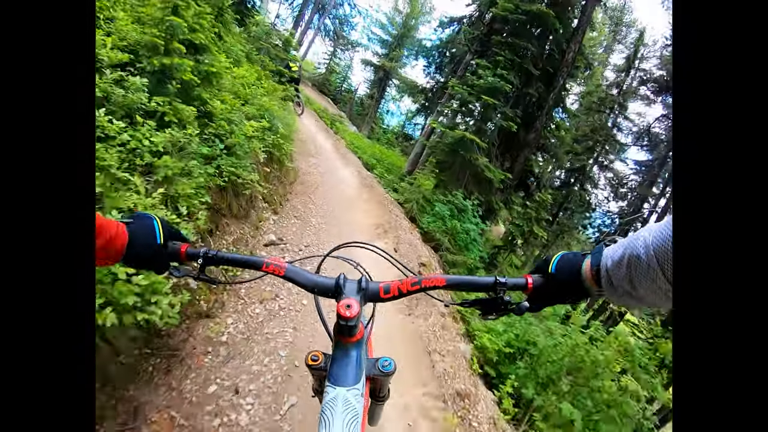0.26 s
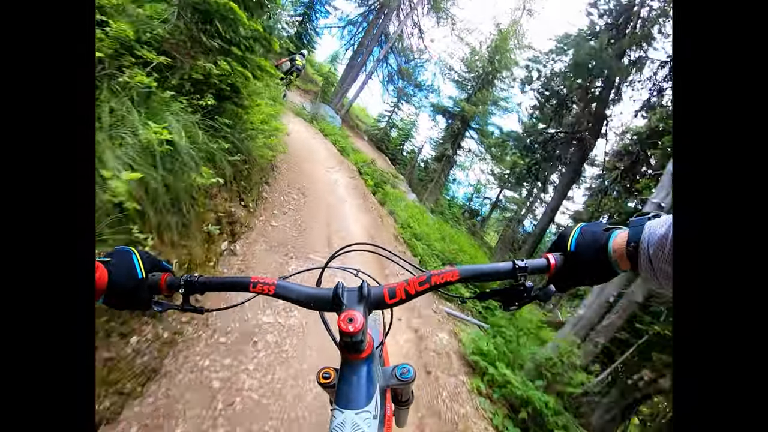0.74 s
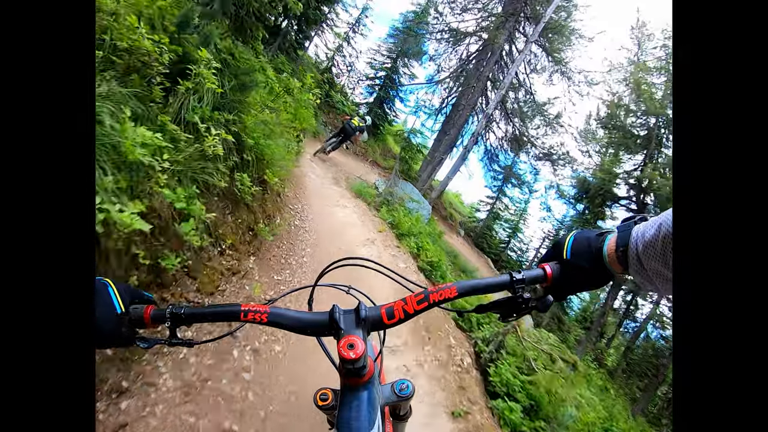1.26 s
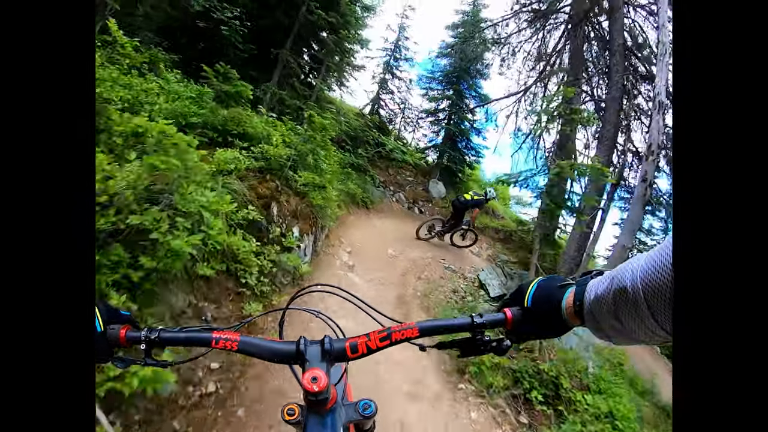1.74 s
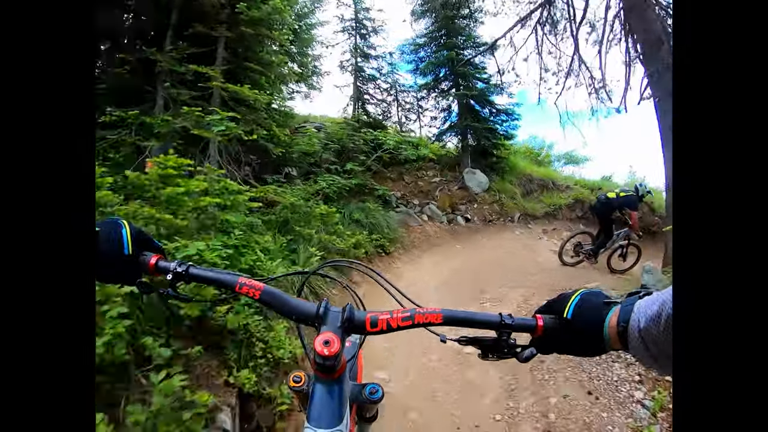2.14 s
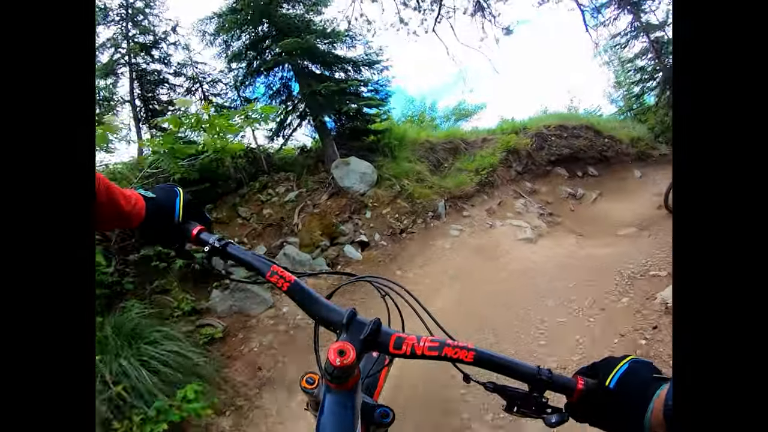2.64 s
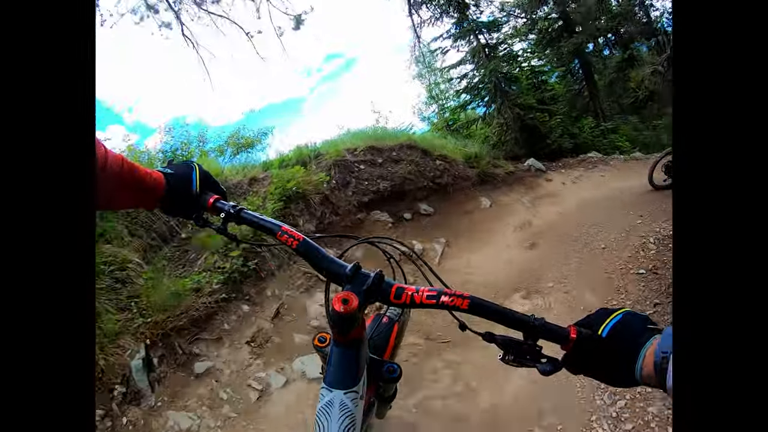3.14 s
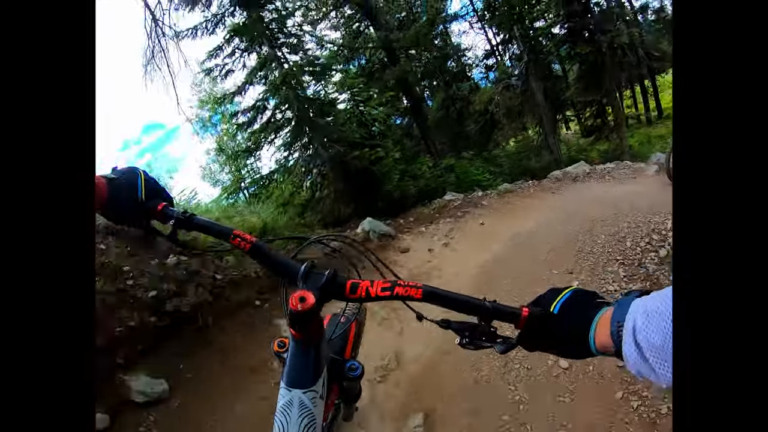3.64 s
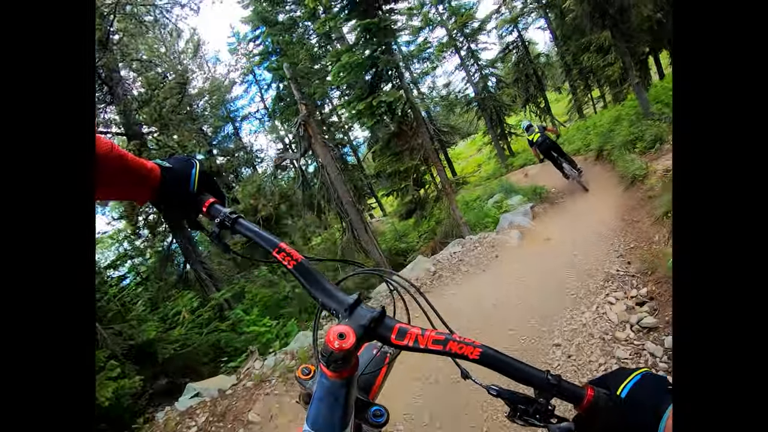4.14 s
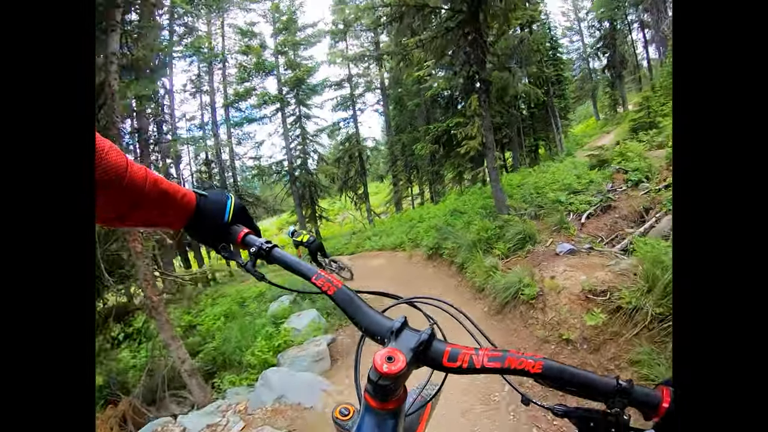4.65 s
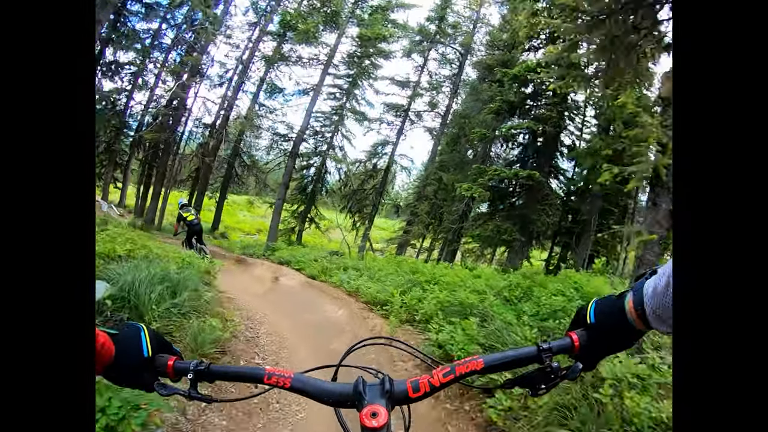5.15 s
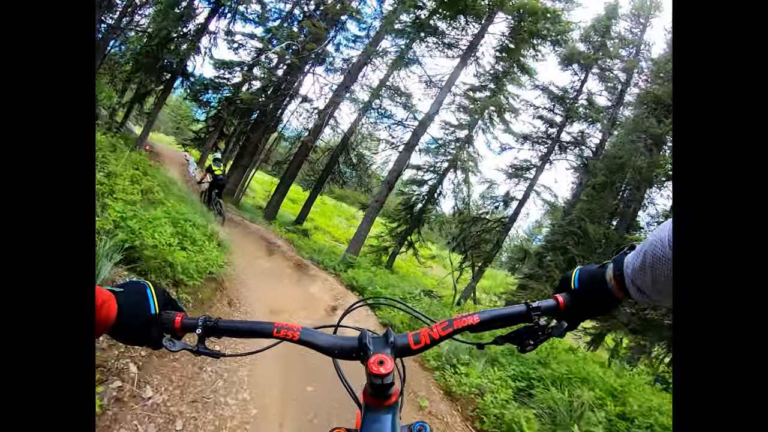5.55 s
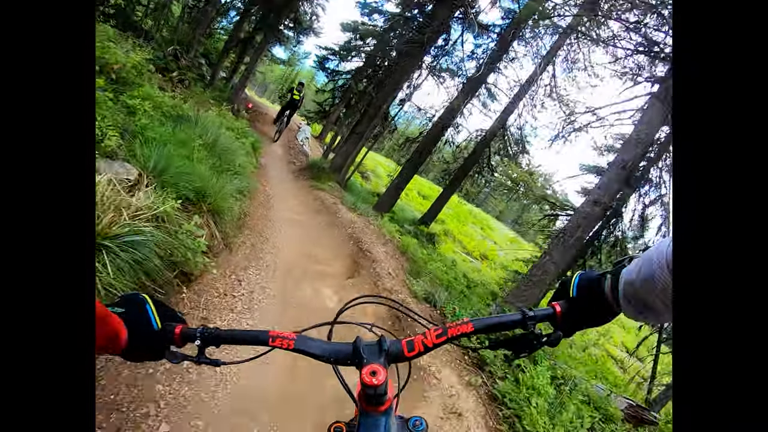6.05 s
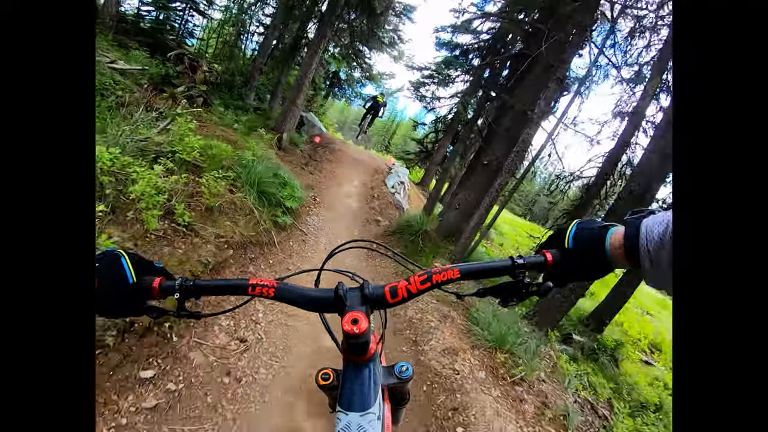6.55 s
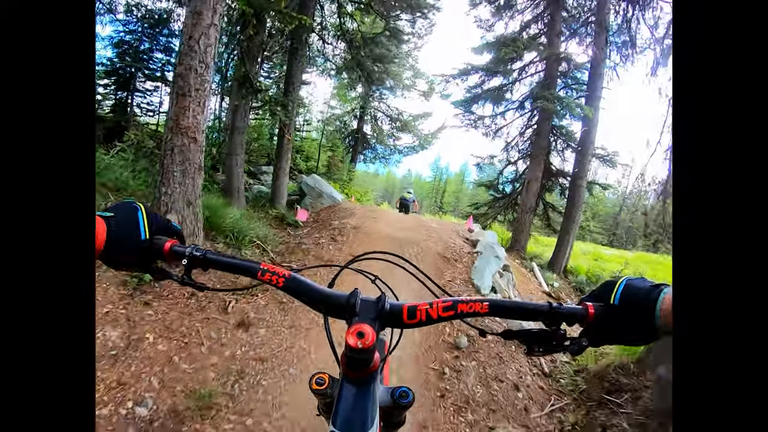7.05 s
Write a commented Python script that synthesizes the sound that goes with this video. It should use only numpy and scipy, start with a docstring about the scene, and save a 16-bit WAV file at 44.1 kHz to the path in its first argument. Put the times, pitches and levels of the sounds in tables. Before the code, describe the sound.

A mountain bike coasts down a dirt trail, heard close from the rider's chest. Throughout, low wind buffets the microphone over crunching, softly humming tyres and the rapid ticking of the freewheel. Chain and cables clatter against the frame in the first 0.6 seconds, with a couple of sharp snaps of grit. The wind gusts strongly, with its hardest thump at about 1.2 seconds. From around 2 seconds the ticking slows and the wind eases unevenly, while scattered knocks and grit continue. Between 3 and 4 seconds the ticking is slowest and brightest, under a run of duller knocks, and the tyre hum swells near 4 seconds. A sharp clack lands at 5 seconds, then the ticking speeds up. From 6 seconds come stronger gusts, flicks of grit and a burst of hard chain clatter, with the bike still rolling at the end, around 7.3 seconds.

```python
"""A mountain bike coasts down a dirt trail, heard from a camera on the rider's chest.
Chain and cables knock on the ringing frame over bumps, and the freewheel pawls tick in the hub,
slowing into the bend and speeding up out of it. The tyres crunch over dirt, hum with the air
inside them and flick up grit. Under the bike, wind buffets and slaps the microphone port."""
import sys
import numpy as np
from scipy import signal
from scipy.io import wavfile
from scipy.ndimage import uniform_filter1d

SR = 44100
rng = np.random.default_rng(int(sys.argv[2]) if len(sys.argv) > 2 else 0)


def transcribe(signal):
    """Save signal, clipped to [-1, 1], as a 16-bit WAV file at the path in sys.argv[1]."""
    frames = np.atleast_2d(signal).T
    limited = np.clip(frames, -1, 1)
    pcm = np.round(limited * 32767).astype(np.int16)
    wavfile.write(sys.argv[1], SR, pcm)


N = 321930


def amp(db):
    return 10 ** (np.asarray(db) / 20)


def unit_rms(x):
    return x / np.sqrt(np.mean(x ** 2) + 1e-20)


def curve(rows, column=1):
    """Automation lane: one column of a timed table, sample by sample."""
    rows = np.array(rows)
    return np.interp(np.arange(N) / SR, rows[:, 0], rows[:, column])


def wobble(seconds, count=N):
    """Smooth random drift of rms 1."""
    size = max(int(seconds * SR), 2)
    return unit_rms(uniform_filter1d(uniform_filter1d(rng.standard_normal(count), size), size))


def noise_band(low_hz, high_hz):
    """Band-passed noise of rms 1."""
    bandpass = signal.butter(2, [low_hz, high_hz], "band", fs=SR, output="sos")
    return unit_rms(signal.sosfilt(bandpass, rng.standard_normal(N)))


def eq(x, points):
    """Minimum-phase EQ through (freq_hz, gain_db) points."""
    freq_hz, gain_db = np.transpose(points)
    bins_hz = abs(np.fft.fftfreq(8192, 1 / SR))
    log_gain = np.interp(np.log(bins_hz + 1), np.log(freq_hz + 1), gain_db) * np.log(10) / 20
    taps = np.fft.ifft(np.exp(np.conj(signal.hilbert(log_gain)))).real
    return signal.oaconvolve(x, taps[:len(taps) // 2])[:len(x)]


def resonate(x, modes, dry_db, drift_db=0, spot_db=0):
    """Steep resonators over the dry sound; their levels drift, or vary with the spot struck."""
    out = amp(dry_db) * x
    for k, (pitch_hz, width_hz, gain_db) in enumerate(modes):
        b, a = signal.iirpeak(pitch_hz, pitch_hz / width_hz, SR)
        if drift_db:
            gain_db += drift_db * np.tanh(wobble(0.092, len(x)))
        else:
            gain_db += spot_db * rng.standard_normal()
        out = out + (-1) ** k * amp(gain_db) * signal.lfilter(b, a, signal.lfilter(b, a, x))
    return out


# The ring of the frame: pitch_hz, width_hz, gain_db
FRAME_MODES = [(589, 140, -1), (897, 187, 8), (1072, 220, 1), (1687, 72, 3.5), (1960, 370, -3),
               (2514, 303, 8), (3040, 260, -6), (3905, 200, 1), (4500, 630, -6)]
# Chain and cable hits, with thud and rattle set against the clack:
# hit_s, level_db, t60_s, thud_db, rattle_db, pitch_hz, rise_ms
CHAIN_HITS = [(0.047, -13.5, 0.029, -18, -24, 1910, 1.1), (0.076, -10.5, 0.05, -32, -11, 950, 5.5),
              (0.123, -16.5, 0.13, -15, 0.5, 958, 5.6), (.168, -19, 0.035, -18, -3, 2600, 8.7),
              (.236, -15.5, 0.077, -0.5, -12, 1260, 2.3), (.264, -17, 0.038, -11, -24, 1100, 1),
              (.299, -14, 0.028, -12, -8, 2170, 3.1), (.347, -11.5, 0.051, -7, -7.5, 2000, 3.6),
              (.452, -17, 0.038, -10, -13, 2630, 4.4), (.485, -15, 0.047, -12, -16, 990, 2.2),
              (.506, -11, 0.053, -7, -10, 895, 7.9), (.579, -16.5, 0.029, -14, -20, 1090, 3.5),
              (.614, -19, 0.074, -21, -13, 1070, 6.4), (0.85, -11, 0.047, -20, -16, 1800, 5.1),
              (1.006, -17.5, 0.081, -11, -11, 1800, 6), (1.165, -18, 0.044, -28, -5, 2500, 8.7),
              (1.206, -18, 0.021, -12, -23, 1050, 3.5), (1.38, -19.5, 0.049, -5, -21, 2640, 5),
              (1.735, -13.5, 0.021, -12, -13, 2680, 2.2), (1.988, -15, 0.047, -11, -17, 2550, 4),
              (2.023, -20, 0.16, -17, 1, 2570, 8), (2.208, -15, 0.048, -22, -14, 2936, 3.2),
              (2.236, -21, 0.043, -24, 1.5, 1200, 2.4), (2.3179, -9.5, 0.0087, -15, -30, 1230, 1.7),
              (2.419, -13.5, .061, -10, -5, 1040, 5.2), (2.474, -23.5, 0.058, 11.5, -15, 1000, 6.8),
              (2.492, -24, 0.055, -1, 4, 1050, 7.6), (2.524, -12, 0.035, -28, -10, 1060, 9.8),
              (2.654, -13, 0.047, -5.5, -8, 2650, 2.8), (2.939, -12, 0.032, -11, -7.5, 2430, 2.16),
              (3.254, -19, 0.039, -10, -18, 1150, 1.2), (3.317, -15.5, 0.12, 1, -20, 1030, 2.2),
              (3.355, -21, 0.079, 4.5, -9, 1870, 4), (3.382, -15.5, 0.069, -9, -12, 1074, 2),
              (3.454, -18, 0.087, 3.5, -24, 2553, 2.3), (3.491, -20.5, 0.052, 2.5, -8, 1060, 3.5),
              (3.534, -16, 0.077, -9, -20, 1000, 1.8), (3.709, -17.5, 0.034, 5, -1.5, 915, 9.8),
              (3.73, -22, 0.076, 7.5, -12, 1810, 4.3), (3.751, -14, 0.11, 2, -18, 987, 8),
              (3.931, -15, 0.047, 7, -22, 937, 1.96), (3.939, -19.5, 0.053, 3.5, 1.5, 950, 3.2),
              (4.404, -16, 0.033, -14, -18, 1880, 10), (4.865, -23, 0.054, -11, 0, 2520, 4.4),
              (5.0022, -4, 0.015, -13, -37, 1707, 4.4), (5.16, -17.5, 0.06, 2, -23, 1025, 1.8),
              (5.217, -13, 0.039, -4, -13, 807, 11), (5.365, -17, 0.089, -12, -24, 2634, 8.4),
              (5.596, -18.5, 0.036, -25, -6, 1031, 4.4), (6.052, -19.5, 0.072, -15, -2, 2493, 5.5),
              (6.0743, -9, .03, -12, -12, 2073, 2.8), (6.094, -9.5, 0.043, -29, -21, 1020, 5.4),
              (6.139, -18, 0.048, 2, 2, 1976, 5.1), (6.261, -5, 0.044, -25, -19, 2000, 3.8),
              (6.419, -15.5, 0.037, -1, -5, 3037, 5), (6.459, -7.5, 0.1, -4.5, -20, 2520, 4.9),
              (6.605, -10, 0.069, -5, -7, 2000, 6.2), (6.652, -13.5, 0.11, -20, -4, 856, 7.8),
              (6.688, -15.5, 0.094, -8, -5, 2154, 8.3), (6.727, -20.5, 0.06, 3, 2, 985, 5.9),
              (6.855, -17, 0.041, -22, -5, 2635, 5), (6.896, -20.5, 0.026, -15, -6, 1008, 2.8),
              (6.918, -16, 0.034, -24, -18, 2640, 6.2), (7.02, -11, 0.039, -16, -32, 1050, 1.3),
              (7.07, -21, 0.026, -13, -20, 990, 2.7), (7.136, -16.5, .052, -22, -14, 1170, 6)]


def chain_knocks():
    """Each bump throws chain links against the frame: a clatter swells to one hard blow and dies."""
    out, lead = np.zeros(N + SR), SR // 40
    t = (np.arange(SR // 8) - lead) / SR
    for hit_s, level_db, t60_s, thud_db, rattle_db, pitch_hz, rise_ms in CHAIN_HITS:
        doubling_s = np.clip(rise_ms, 1, 10) / 1000
        envelope = amp(np.where(t < 0, 6 * t / doubling_s, -60 * t / t60_s))
        crackle = rng.standard_normal(len(t)) * amp(9.4 * rng.standard_normal(len(t)))
        clatter = envelope * unit_rms(crackle)
        thud = eq(clatter, [(150, -12), (380, -8), (650, -8.5), (1000, -35.5)])
        rattle = eq(clatter, [(2200, 1.5), (3500, 18), (5500, 14), (7000, 4.5), (14000, -61)])
        links = eq(clatter, [(250, -14), (600, -5), (pitch_hz, 0), (3400, -5), (5000, -24), (9000, -40)])
        links = resonate(links, FRAME_MODES, dry_db=1, spot_db=4.5)
        blow = -np.cos(2 * np.pi * pitch_hz * t) * np.exp(-(2 * pitch_hz * t) ** 2)
        blow_gain = 0.04 / t60_s  # the shorter the hit, the more it is one hollow blow
        clack = links / abs(links).max() + blow_gain * resonate(blow, FRAME_MODES, dry_db=2)
        layers = [(clack, 0), (thud, thud_db), (rattle, rattle_db)]
        knock = sum(amp(db) * x / abs(x).max() for x, db in layers)
        out[round(hit_s * SR) - lead:][:len(t)] += amp(level_db) * knock
    return out[:N]


# Ratchet speed, following the wheel: time_s, teeth_per_s
RATCHET_SPEED = [(0.0, 121), (0.7, 97), (1.48, 88.5), (1.75, 63), (1.97, 72), (2.24, 58.4), (2.97, 65),
                 (3.17, 47.4), (3.4, 48.3), (3.95, 50.5), (4.17, 60), (4.37, 49.7), (4.76, 62.1),
                 (5.02, 51), (5.26, 72), (5.85, 86), (6.18, 74), (7.3, 82)]
# The ring of the hub shell, low ring first: pitch_hz, width_hz, gain_db
HUB_MODES = [(2540, 430, -5), (4165, 370, 3.5), (4600, 290, 1), (4880, 140, 8.5), (5350, 430, 2)]
# Tone of the fizz after each tick: freq_hz, gain_db
FIZZ_EQ = [(3000, 2), (4500, 12), (6000, 3.5), (7500, 12.5), (11500, 10), (15000, 10)]
# Hub mix at the microphone as the bike leans: time_s, ring_db, fizz_db, sizzle_db, low_ring_db
HUB_MIX = [(0.0, -58, -55, -41, -51), (0.3, -41.5, -59, -45, -81), (1.05, -42.5, -49, -42, -38.5),
           (1.7, -43, -60, -44, -45.5), (2.6, -38.5, -42.5, -37.5, -45), (3.3, -39, -42.5, -34.5, -42),
           (3.78, -39, -35, -29.5, -49), (4.85, -44, -47, -35, -40), (5.2, -43, -48, -37, -39),
           (6.15, -41.5, -43, -36, -60), (6.27, -45, -58, -45, -62), (6.5, -39.5, -46, -39.5, -39),
           (7.3, -45, -57, -40, -55)]


def freewheel():
    """Two pawls drop a moment apart at each tooth; the hub shell rings and fizzes out after them."""
    chain_tug = 1 + 0.065 * wobble(0.03)  # the suspension pulls on the chain
    teeth = np.floor(np.cumsum(curve(RATCHET_SPEED) * chain_tug) / SR)
    drops = np.diff(teeth, prepend=0) * amp(1.3 * rng.standard_normal(N))
    t = np.arange(SR // 16) / SR

    def pawls(t60_s, second_gain, gap_s=0.0027):
        """A double noise burst of uneven strength at every tooth."""
        first = amp(-60 * t / t60_s) * np.minimum(t / 0.00053 + 0.5, 1)
        second = second_gain * (t > 0.0015) * np.roll(first, round(gap_s * SR))
        strength = amp(2.04 * rng.standard_normal(N))
        return signal.oaconvolve(drops * strength, first + second)[:N] * rng.standard_normal(N)

    strikes = pawls(t60_s=0.024, second_gain=0.21) + 5.1 * drops
    ring = resonate(strikes, HUB_MODES[1:], dry_db=-20)
    low_ring = resonate(strikes, HUB_MODES[:1], dry_db=-27.5)
    tails = eq(pawls(t60_s=0.069, second_gain=0.14) + 0.36 * rng.standard_normal(N), FIZZ_EQ)
    crossover_hz = 9600
    fizz = signal.sosfilt(signal.butter(6, crossover_hz, "low", fs=SR, output="sos"), tails)
    sizzle = signal.sosfilt(signal.butter(6, crossover_hz, "high", fs=SR, output="sos"), tails)
    layers = [ring, fizz, sizzle, low_ring]
    return sum(amp(curve(HUB_MIX, column)) * unit_rms(x) for column, x in enumerate(layers, 1))


# Tone of tread on dirt: freq_hz, gain_db
CRUNCH_EQ = [(200, -12.5), (400, -14), (700, -12), (1300, -3.5), (2500, -6), (3500, -7.5), (6000, -15.5),
             (14000, -24)]
# Tyre faders along the trail: time_s, hum_db, rumble_db, crunch_db
TYRE_MIX = [(0.08, -31, -47, -29), (0.14, -31, -35, -32), (0.28, -34.5, -39, -30), (1.85, -48, -47.5, -38),
            (2.33, -33.5, -46, -31.5), (2.35, -38.5, -43, -31), (2.69, -34.5, -35, -34.5),
            (3.16, -47, -39.5, -38), (3.22, -35.5, -43, -37), (3.46, -50, -39.5, -36.5),
            (3.52, -40, -34.5, -37), (3.66, -44, -37.5, -32.5), (3.75, -35, -31.5, -33.5),
            (3.92, -26, -39.5, -35.5), (4.17, -29.5, -35.5, -36), (4.26, -26.5, -40.5, -37.5),
            (4.44, -51, -35.5, -36), (4.6, -36.5, -41, -36), (4.74, -42.5, -38, -34),
            (4.91, -35, -35.5, -36.5), (5.87, -29, -35, -35), (6.31, -34, -37.5, -31),
            (6.79, -39, -43.5, -35), (7.02, -28.5, -43, -30.5), (7.3, -36.5, -37.5, -33)]


def tyre_crunch(rattles_per_s=90):
    """Knobs on dirt and small random rattles, a few ms each, set the frame ringing."""
    hits = (rng.random(N) < rattles_per_s / SR) * amp(3.8 * np.minimum(rng.exponential(1, N), 3))
    rattles = signal.oaconvolve(hits, signal.windows.hann(round(0.0047 * SR)), "same")
    dirt = rng.standard_normal(N) * (amp(1.45 * wobble(0.014)) + 0.5 * rattles)
    frame = resonate(eq(dirt, CRUNCH_EQ), FRAME_MODES, dry_db=-2, drift_db=2)
    return amp(curve(TYRE_MIX, column=3)) * unit_rms(frame)


def tyre_hum(pitch_hz=279.1, waver_hz=3.46, width_hz=41):
    """The trail shakes the ring of air inside the tyre; the casing rumbles above it."""
    cavity_hz = pitch_hz + waver_hz * wobble(0.0595)  # the tyre squashes over the ground
    tone = np.exp(2j * np.pi * np.cumsum(cavity_hz) / SR)
    pole = np.exp(-np.pi * width_hz / SR)
    shake = rng.standard_normal(N) + 1j * rng.standard_normal(N)
    swell = signal.lfilter([1], [1, -2 * pole, pole * pole], shake)
    compressed = swell / (abs(swell) + 1e-9) ** 0.72  # keeps the hum from breaking up
    hum = amp(curve(TYRE_MIX) + 2.9 * wobble(0.016)) * unit_rms((tone * compressed).real)
    rumble = amp(curve(TYRE_MIX, column=2) + 2.65 * wobble(0.01)) * noise_band(217, 786)
    return hum + rumble


# Flying grit: start_s, peak_db, pitch_hz, ring_db, t60_s
GRIT_HITS = [(0.097, -18, 4100, 7, 0.024), (0.5688, -14.5, 3770, 19, 0.036), (1.9811, -21, 3450, 8, 0.097),
             (2.4283, -12, 4350, 8, 0.0098), (2.653, -19.5, 4130, 15, 0.03),
             (3.2784, -15, 5250, 11.5, 0.13), (3.353, -17, 4300, 12, 0.032), (3.918, -21, 4900, 5, 0.027),
             (3.965, -13.5, 4220, 13, 0.032), (4.849, -17, 4035, -2, 0.027),
             (5.2026, -14.5, 3650, 5, 0.023), (6.04, -21, 3700, 6, 0.03), (6.108, -14, 3660, 5, 0.027),
             (6.324, -13, 3390, -6, 0.016), (6.4043, -20, 3380, 5, 0.037), (6.445, -17, 4200, 2, 0.03)]


def grit():
    """Grit flicks the camera and frame: bright snaps, each with a brief ring."""
    out, t = np.zeros(N + SR), np.arange(SR // 16) / SR
    for start_s, peak_db, pitch_hz, ring_db, t60_s in GRIT_HITS:
        burst = rng.standard_normal(len(t)) * amp(-60 * t / t60_s)
        burst[0] += 2.5  # first crack, ahead of the scatter
        snap = eq(burst, [(1500, 2), (3000, 6), (6000, -3), (14000, -11.5)])
        snap += resonate(burst, [(pitch_hz, 500, ring_db)], dry_db=-40)
        out[round(start_s * SR):][:len(t)] += amp(peak_db) * snap / abs(snap).max()
    return out[:N]


# Bass-heavy tone of the buffeting: freq_hz, gain_db
BUFFET_EQ = [(7, -47), (12, -3.5), (81, -5), (160, -17.5), (300, -39), (600, -42), (1500, -109)]
# Wind faders: time_s, buffet_db, roar_db
WIND_MIX = [(0.1, -19.5, -27.5), (0.85, -26.5, -30), (0.94, -19, -26.5), (1.14, -25, -29),
            (1.2, -17, -26.5), (1.28, -25.5, -34), (1.34, -19.5, -28), (1.42, -27.5, -35.5),
            (1.87, -24.5, -32), (2.01, -32.5, -33.5), (2.11, -22, -34), (2.54, -35.5, -33.5),
            (2.72, -26, -34.5), (2.82, -37, -34), (2.91, -23, -29), (3.13, -35, -46), (3.17, -27.5, -41),
            (3.36, -32.5, -34.5), (3.42, -36, -46), (3.59, -23.5, -27.5), (3.88, -39, -51),
            (3.96, -33.5, -42), (4.15, -36, -33.5), (4.41, -27, -28), (4.67, -34, -28), (4.79, -38, -48),
            (4.83, -28, -31.5), (5.24, -33.5, -42), (5.3, -26.5, -33), (5.71, -31.5, -37),
            (6.2, -19.5, -26), (6.35, -25, -35), (6.7, -21, -29), (7.0, -25, -26), (7.3, -23, -20.5)]


def wind():
    """Eddies press on the microphone port in lumps; a higher roar rides on them and gusts with them."""
    lumps = amp(1.9 * wobble(0.022) + 0.75 * wobble(0.14))
    gust = wobble(0.019)
    eddies = unit_rms(eq(rng.standard_normal(N) * lumps, BUFFET_EQ))
    buffet_db = curve(WIND_MIX) + 0.76 * gust
    roar_db = curve(WIND_MIX, column=2) + 2.34 * gust + 0.32 * wobble(0.091)
    return amp(buffet_db) * eddies + amp(roar_db) * noise_band(62, 267)


# Single hard eddies: centre_s, peak_db, pitch_hz, polarity (1 pushes, -1 pulls)
EDDY_SLAPS = [(0.174, -19, 70, -1), (0.8, -24, 70, -1), (0.94, -20, 58, -1), (1.184, -6.5, 60, -1),
              (1.221, -13, 50, -1), (1.35, -15.5, 38, -1), (1.369, -21, 80, -1), (1.438, -15, 79.5, 1),
              (2.275, -16.5, 82, 1), (2.597, -16, 83, -1), (2.73, -14.5, 45.6, 1), (2.898, -22, 70, 1),
              (3.212, -22.5, 100.3, 1), (3.585, -20, 113.8, 1), (3.607, -18, 90, -1), (4.389, -20, 70, 1),
              (4.434, -19, 141, 1), (4.843, -17, 112, -1), (5.168, -19, 60, 1), (5.264, -17, 110, -1),
              (5.407, -11.5, 111, -1), (6.184, -15, 91, -1), (6.231, -16, 70, -1), (6.271, -18, 60, -1),
              (6.3, -14.5, 50.2, -1), (6.552, -13.5, 121, 1)]


def wind_slaps():
    """An eddy slaps the port: one swing of pressure with a rebound on both sides."""
    out, lead = np.zeros(N), SR // 20
    t = np.arange(-lead, lead) / SR
    for centre_s, peak_db, pitch_hz, polarity in EDDY_SLAPS:
        spread = (np.pi * pitch_hz * t) ** 2
        slap = (1 - 2 * spread) * np.exp(-spread)
        out[round(centre_s * SR) - lead:][:len(t)] += polarity * amp(peak_db) * slap
    return out


def scene():
    """Wind and bike meet at one microphone, in mono."""
    return (wind() + wind_slaps() + tyre_hum() + tyre_crunch() + chain_knocks() + grit() + freewheel())[None]


# Tone of the camera housing and microphone port: freq_hz, gain_db
HOUSING_EQ = [(10, 2), (5300, -3), (5900, -11.5), (6500, -12), (8000, -12.5), (9600, -23.5), (10400, -21),
              (11300, -13.5), (12800, -21.5), (13600, -34), (15000, -39), (16000, -50)]


def record(dry):
    """The housing dulls the treble, and a steep low-pass cuts the very top."""
    muffled = np.pad(eq(dry[0], HOUSING_EQ), 255, "reflect", reflect_type="odd")
    lowpass = signal.firwin(511, cutoff=15800, window=("kaiser", 9), fs=SR)
    return signal.oaconvolve(muffled, lowpass, "valid")[None]


dry = scene()
out = record(dry)
transcribe(out)
```